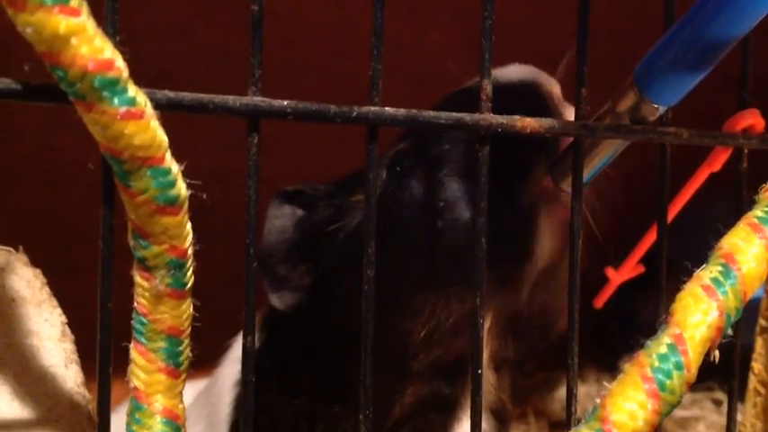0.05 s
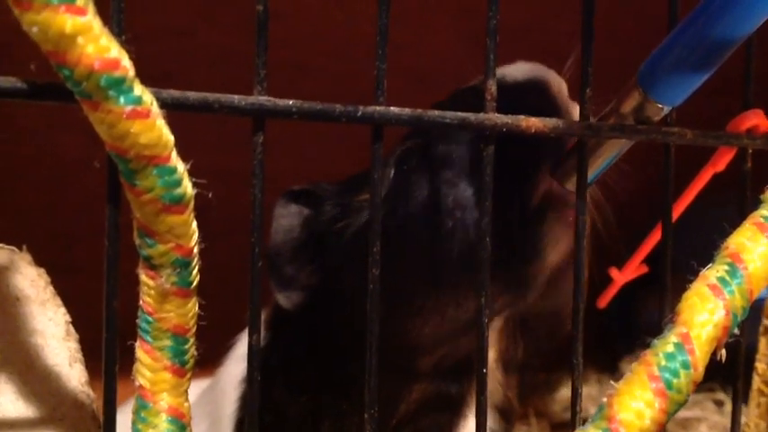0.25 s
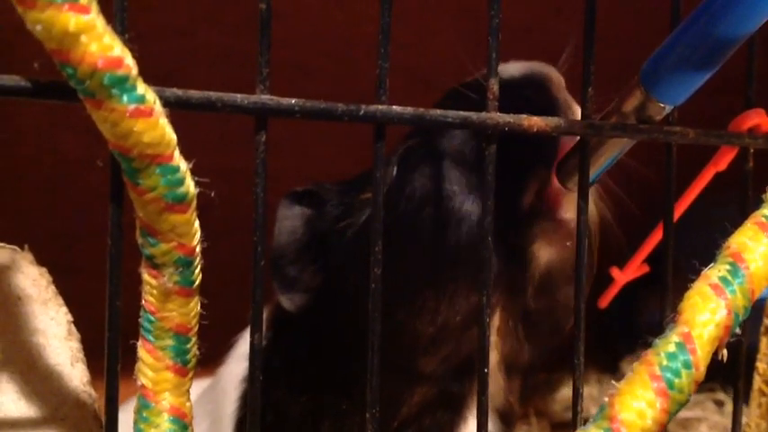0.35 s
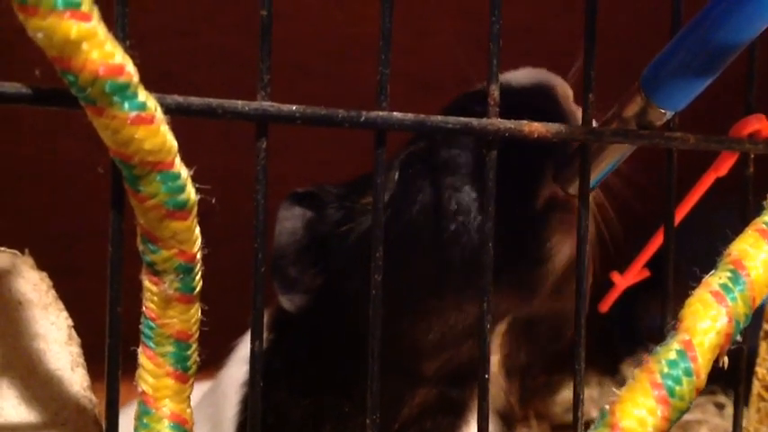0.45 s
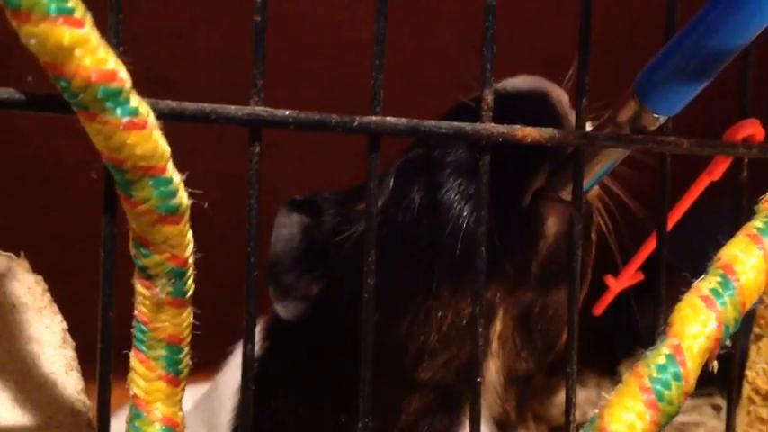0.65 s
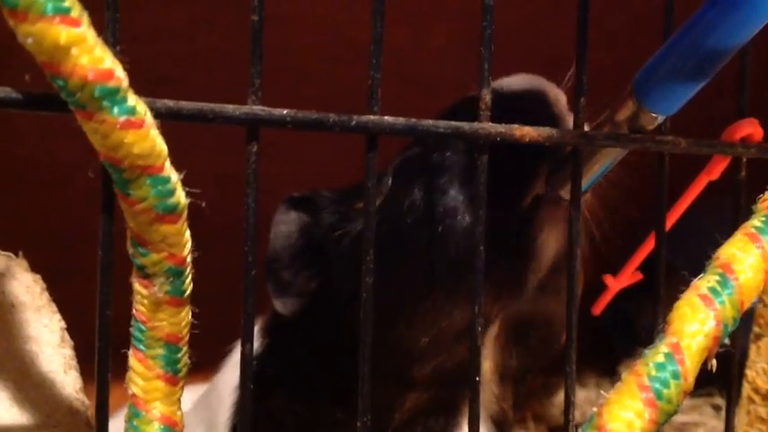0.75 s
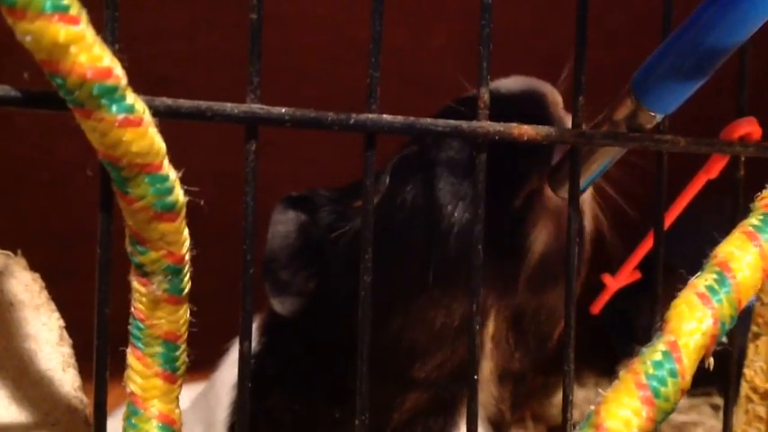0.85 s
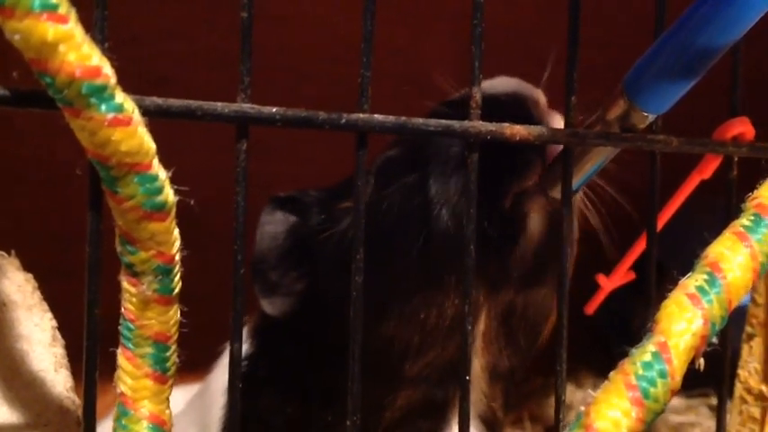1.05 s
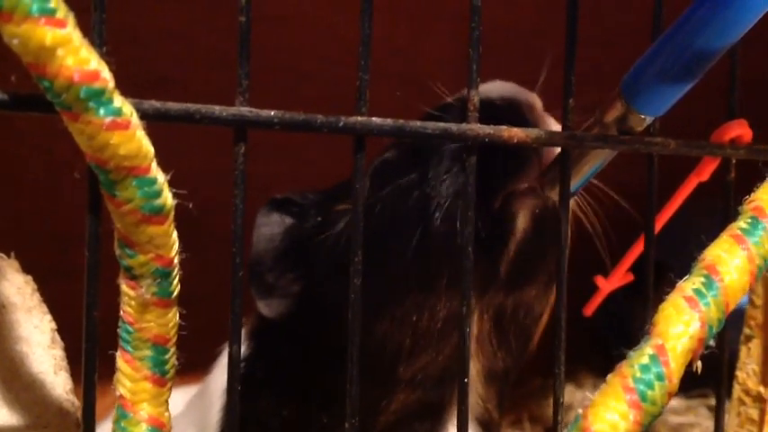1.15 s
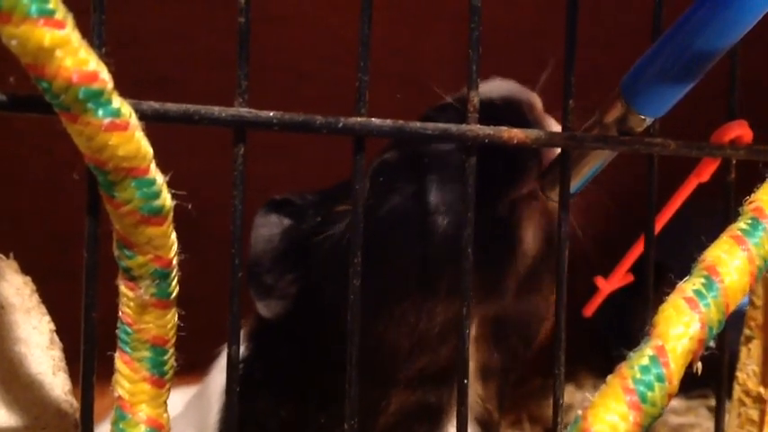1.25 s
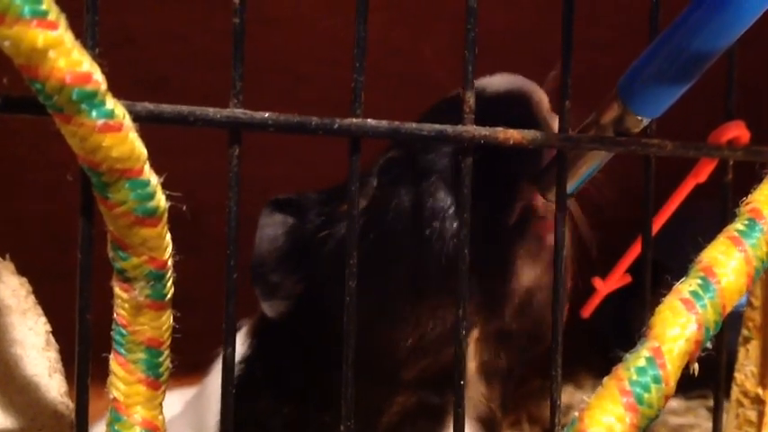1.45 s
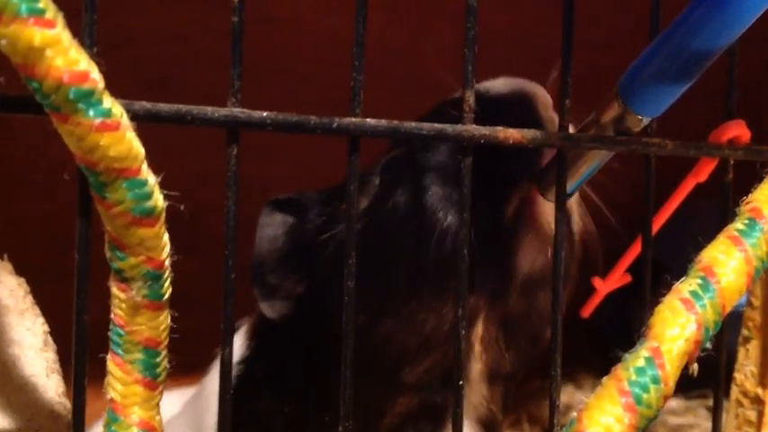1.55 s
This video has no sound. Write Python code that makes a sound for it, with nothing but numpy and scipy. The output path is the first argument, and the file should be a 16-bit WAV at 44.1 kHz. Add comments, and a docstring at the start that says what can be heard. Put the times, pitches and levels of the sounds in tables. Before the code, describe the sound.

Metal water bottle spout rattling against a wire cage, with faint guinea pig squeaks.

```python
"""Guinea pig at a water bottle

The steel ball clacks in the spout and the spout knocks on the bars of a wire cage.
Each contact pings, rings the tube and the wires, and dies away in a small room.
Between rattles: soft falling squeaks and wet mouth smacks, over a quiet indoor hiss."""
import sys
import numpy as np
from scipy import signal
from scipy.fft import rfft, irfft
from scipy.io import wavfile
from scipy.ndimage import map_coordinates

SR = 44100
rng = np.random.default_rng(int(sys.argv[2]) if len(sys.argv) > 2 else 0)


def unload_wav(signal):
    """Save mono or channel-first audio to the path in sys.argv[1] as 16-bit WAV at rate SR, clipped to [-1, 1]."""
    wavfile.write(
        sys.argv[1],
        SR,
        np.round(np.clip(np.atleast_2d(signal).T, -1, 1) * 32767).astype(np.int16),
    )


N = 70560
ROOM_BUILD_S = .003


def rattles():
    """Ball, spout tube and bars strike each other in short runs."""
    # contacts (time [s], thud [dB], knock [dB], clank [dB], ping [dB], struck bar pitch [Hz])
    contacts = [ (.1575, -75, -75, -53, -48, 6100), (.2012, -57, -43, -58, -55, 4100),
                (.2193, -45, -31, -40, -31, 4100), (.2290, -49, -32, -41, -49, 4100),
                (.3688, -31, -20, -41, -39, 3500), (.3840, -37, -29, -35, -41, 5900),
                (.3904, -32.5, -25, -24.5, -26, 4530), (.4085, -33, -26, -30, -27, 4090),
                (.4835, -38, -23.5, -30, -36, 5230), (.4937, -41, -31, -28, -37, 5480),
                (.5615, -28, -19, -46, -37, 4100), (.5785, -36, -33, -30, -30, 5900),
                (.5942, -25.5, -21.5, -17.5, -18, 4200), (.6030, -31, -29, -28, -23, 3850),
                (.6215, -33, -34, -41, -39, 3370), (.7404, -36, -19, -27, -34, 4090),
                (.7592, -48, -38, -37, -39, 6000), (.8553, -49, -43, -47, -41, 4100),
                (.8628, -46, -32, -38, -36, 3400), (.8816, -41, -24.5, -33.5, -27, 4100),
                (.8958, -49, -29, -33, -46, 4900), (.9950, -53, -54, -56, -61, 4100),
                (1.5735, -50, -45, -52, -44, 4100), (1.5985, -48, -37, -38, -31, 4400)]
    out, t = np.zeros(N), np.arange(SR // 3) / SR
    for start_s, thud_db, knock_db, clank_db, ping_db, bar_hz in contacts:
        thud = amp(thud_db) * cage_thud(t)
        knock = amp(knock_db) * tube_knock(t)
        clank = amp(clank_db) * bar_clank(t, bar_hz)
        ping = amp(ping_db) * ball_ping(t)
        metal = chatter(knock + clank + ping)
        add(out, start_s, metal + thud + wires(t, thud_db, knock_db, clank_db, bar_hz))
    return out


def tube_knock(t, width_s=.00075, peak_s=.0016, wall_delay_s=.00435):
    """The water-filled spout swells and dies in a few cycles; the cage wall echoes it once."""
    # knock spectrum (frequency [Hz], level [dB])
    colour = [(700, -24), (1500, -6), (1850, -7), (2400, 0), (3000, -8), (4200, -13), (7000, -40)]
    # envelope (rise [s], t60 [s], room level [dB], room t60 [s])
    shape = (.002, .035, -6, .16)
    hz = 2290 * (1 + .02 * rng.standard_normal())
    pulse = lambda u: np.exp(-.5 * (u / width_s) ** 2) * np.sin(2 * np.pi * hz * u)
    tube = pulse(t - peak_s) + amp(-11) * pulse(t - peak_s - wall_delay_s)
    return amp(.5) * tube + amp(-12.5) * burst(colour, shape, t)


def bar_clank(t, bar_hz, rim_hz=6100, ring_rise_s=.0015):
    """The struck bar cracks and rings; the spout's steel rim sounds briefly."""
    # clank spectrum (frequency [Hz], level [dB])
    colour = [(1500, -25), (2900, -5), (4200, 0), (4900, -2), (6100, -1), (7100, -9), (9500, -10),
              (12000, -20), (16000, -30)]
    # envelope (rise [s], t60 [s], room level [dB], room t60 [s])
    shape = (.0012, .021, -13, .125)
    crack = swell(t, rise_s=.0006)
    ring = (1 - np.exp(-t / ring_rise_s)) * fade(t, t60_s=.055)
    bar = (amp(-4.5) * crack + amp(-8) * ring) * np.sin(2 * np.pi * bar_hz * t)
    rim = amp(-8) * crack * np.sin(2 * np.pi * rim_hz * t)
    return bar + rim + burst(colour, shape, t)


def ball_ping(t, hz=12200):
    """The steel ball's high, heavily damped ping."""
    # ping spectrum (frequency [Hz], level [dB])
    colour = [(4000, -35), (7500, -14), (9500, -10), (11000, -10), (12200, 0), (13300, -8), (15000, -12),
              (17000, -25)]
    # envelope (rise [s], t60 [s], room level [dB], room t60 [s])
    shape = (.0005, .013, -15, .09)
    return amp(-2) * swell(t, rise_s=.0004) * np.sin(2 * np.pi * hz * t) + burst(colour, shape, t)


def cage_thud(t, hz=980):
    """The dull first push against the cage."""
    # thud spectrum (frequency [Hz], level [dB])
    colour = [(150, -28), (230, -13), (450, -10), (620, 0), (1000, 0), (1550, -1), (2100, -13), (4000, -45)]
    # envelope (rise [s], t60 [s], room level [dB], room t60 [s])
    shape = (.001, .025, -10, .17)
    return amp(-4) * swell(t, rise_s=.0005) * np.sin(2 * np.pi * hz * t) + burst(colour, shape, t)


def chatter(contact, count=4, min_s=.003, max_s=.012, rebound_db=-20):
    """A contact plus weak rebounds at uneven delays."""
    out = contact.copy()
    for delay_s in rng.uniform(min_s, max_s, count):
        lag = int(SR * delay_s)
        out[lag:] += amp(rebound_db) * contact[:-lag]
    return out


def wires(t, thud_db, knock_db, clank_db, bar_hz, sympathy_width_hz=350):
    """Cage wires ring on, boosted where tuned near the struck bar."""
    # wire modes (frequency [Hz], level [dB], t60 [s])
    modes = [(628, -1, .2), (865, 0, .16), (950, 1.5, .29), (1015, 0, .14), (1275, 1, .1), (1364, -1, .13),
             (1515, 3, .15), (2070, -1, .11), (2262, 2, .09), (2385, -4, .22), (2537, -1, .13),
             (2772, -9, .28), (3368, -2, .19), (4094, -5, .12), (5230, -5, .1), (5600, -6, .15)]
    ring = np.zeros(len(t))
    for hz, db, t60_s in modes:
        drive_db = thud_db if hz < 1700 else knock_db if hz < 3000 else clank_db
        sympathy_db = 6 * np.exp(-((hz - bar_hz) / sympathy_width_hz) ** 2)
        gain = amp(drive_db + sympathy_db + db + rng.normal(0, 2))
        ring += gain * fade(t, t60_s) * np.sin(2 * np.pi * (hz * t + rng.random()))
    return amp(-21) * ring * (1 - np.exp(-t / ROOM_BUILD_S))


def floor_booms():
    """The hardest blows shake the cage floor."""
    # blows (time [s], level [dB])
    blows = [(.391, -49), (.580, -40), (.596, -38)]
    # floor spectrum (frequency [Hz], level [dB])
    colour = [(130, -24), (210, -2), (320, 2), (450, -7), (2000, -50)]
    # envelope (rise [s], t60 [s], room level [dB], room t60 [s])
    shape = (.008, .17, -9, .35)
    out, t = np.zeros(N), np.arange(SR // 3) / SR
    for start_s, db in blows:
        add(out, start_s, amp(db) * burst(colour, shape, t))
    return out


def ball_scrape(peak_s=.716, width_s=.016, db=-51.5):
    """The ball slides in the spout before a clack: a soft swell of friction."""
    # friction spectrum (frequency [Hz], level [dB])
    colour = [(300, -10), (1000, 2), (2400, -1), (14000, -19)]
    t = np.arange(N) / SR
    return amp(db) * np.exp(-.5 * ((t - peak_s) / width_s) ** 2) * noise(colour, N)


def squeaks(jitter=.024, flutter_db=1.4, edge_s=.003):
    """Soft, nearly pure guinea pig notes that sag in pitch, then turn up quickly."""
    # notes (start [s], sag length [s], first pitch [Hz], lowest pitch [Hz], upturn [s], level [dB])
    notes = [(.177, .034, 860, 660, .014, -52), (.286, .045, 810, 730, .014, -52),
             (.827, .034, 770, 680, .028, -55.5), (.941, .046, 700, 640, .006, -53.5)]
    # harmonics from the fundamental up (level [dB])
    harmonics_db = [0, -9, -25]
    out, t = np.zeros(N), np.arange(SR // 10) / SR
    for start_s, sag_s, first_hz, lowest_hz, upturn_s, db in notes:
        waver = map_coordinates(rng.standard_normal(size=40), [t * 300])
        sag_hz = first_hz + (lowest_hz - first_hz) * np.minimum(t / sag_s, 1) ** 1.7
        upturn = .42 * np.clip((t - sag_s) / upturn_s, 0, 1)
        hz = sag_hz * (1 + upturn + jitter * waver)
        phase = 2 * np.pi * np.cumsum(hz) / SR
        tone = unit(sum(amp(level) * np.sin(k * phase) for k, level in enumerate(harmonics_db, 1)))
        gate = np.clip(np.minimum(t, sag_s + upturn_s - t) / edge_s, 0, 1)
        add(out, start_s, amp(db + flutter_db * waver) * tone * gate)
    return out


def smacks(half_width_oct=.38):
    """Short wet puffs coloured by the mouth."""
    # puffs (peak time [s], Gaussian width [s], mouth resonance [Hz], level [dB])
    puffs = [(.09, .02, 850, -62), (.341, .004, 1000, -48), (1.222, .0025, 520, -52),
             (1.244, .01, 1080, -50.5), (1.434, .004, 2250, -62)]
    t, hz = np.arange(N) / SR, np.fft.rfftfreq(N, 1 / SR)
    out = np.zeros(N)
    for peak_s, width_s, mouth_hz, db in puffs:
        mouth = 1 / (1 + (np.log2((hz + 1) / mouth_hz) / half_width_oct) ** 2)
        puff = unit(irfft(rfft(rng.standard_normal(N)) * mouth, N))
        out += amp(db) * np.exp(-.5 * ((t - peak_s) / width_s) ** 2) * puff
    return out


def room_hiss(db=-59.7):
    """Quiet, steady indoor air."""
    # air spectrum (frequency [Hz], level [dB])
    colour = [(70, -22), (100, -9), (140, -9), (210, 0), (330, -1), (500, -6), (1600, -11.5), (4000, -15.5),
              (15000, -17)]
    return amp(db) * noise(colour, N)


def burst(colour, shape, t):
    """Dense short-lived modes as decaying noise, plus their room tail."""
    rise_s, t60_s, room_db, room_t60_s = shape
    envelope = (1 - np.exp(-(t / rise_s) ** 2)) * fade(t, t60_s)
    direct = envelope * noise(colour, len(t))
    direct *= np.linalg.norm(envelope) / np.linalg.norm(direct)
    room_envelope = (1 - np.exp(-t / ROOM_BUILD_S)) * fade(t, room_t60_s)
    return direct + amp(room_db) * room_envelope * noise(colour, len(t))


def noise(colour, size):
    """Unit-rms noise shaped by (Hz, dB) points."""
    hz, db = np.transpose(colour)
    bins_hz = np.fft.rfftfreq(size, 1 / SR)
    gain = amp(np.interp(np.log(bins_hz + 1), np.log(hz), db))
    return unit(irfft(rfft(rng.standard_normal(size)) * gain, size))


def swell(t, rise_s):
    """Envelope of a heavily damped mode; peaks at 2 * rise_s."""
    return (t / rise_s / 2) ** 2 * np.exp(2 - t / rise_s)


def fade(t, t60_s):
    """Exponential decay, 60 dB in t60_s."""
    return np.exp(-np.log(1000) * t / t60_s)


def amp(db):
    """Decibels to gain."""
    return 10 ** (np.asarray(db) / 20)


def unit(x):
    """Scale to rms 1."""
    return x / np.sqrt(np.mean(x ** 2) + 1e-20)


def add(out, start_s, x):
    """Mix x into out at start_s."""
    i = int(np.clip(round(start_s * SR), 0, N - 1))
    out[i:i + len(x)] += x[:N - i]


def scene():
    """The drinking animal over room hiss, mono."""
    return (rattles() + floor_booms() + ball_scrape() + squeaks() + smacks() + room_hiss())[None]


def record(dry):
    """Bass cut and treble band limit."""
    low_cut_hz, top_hz = 88, 15300
    highpass = signal.butter(N=3, Wn=low_cut_hz, btype="high", fs=SR, output="sos")
    lowpass = signal.firwin(201, top_hz, fs=SR, window="blackman")
    return signal.fftconvolve(signal.sosfilt(highpass, dry), lowpass[None], mode="same", axes=1)


dry = scene()
out = record(dry)
unload_wav(out)
```